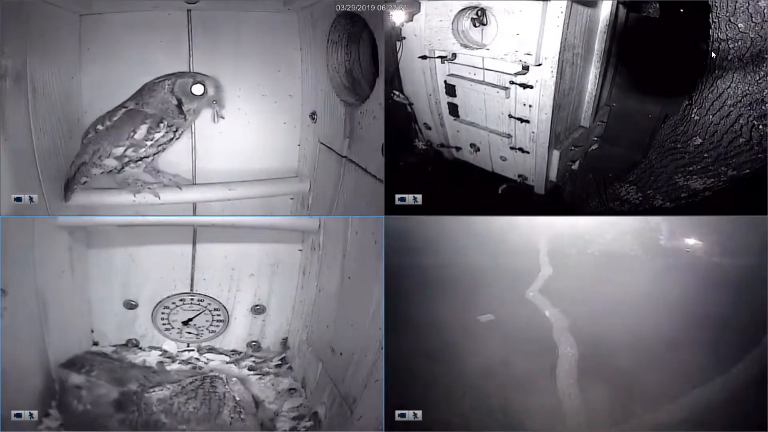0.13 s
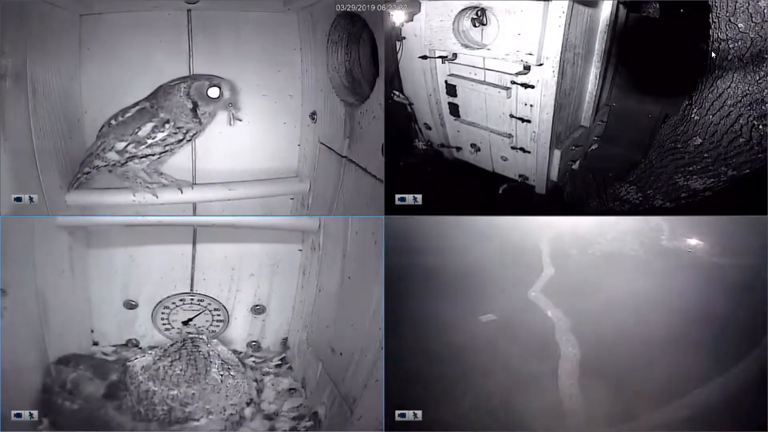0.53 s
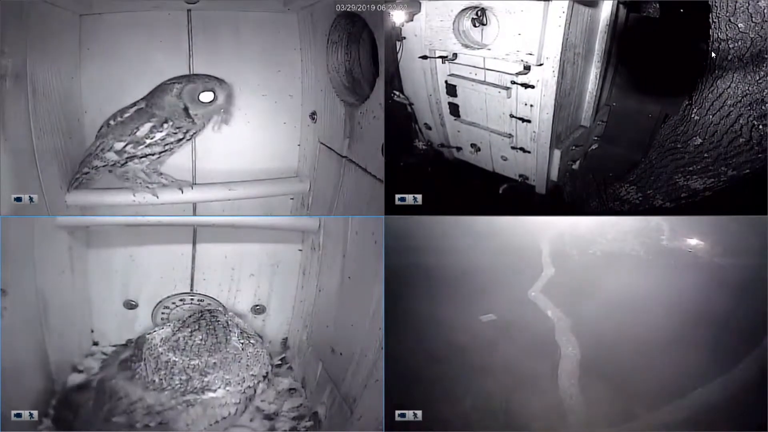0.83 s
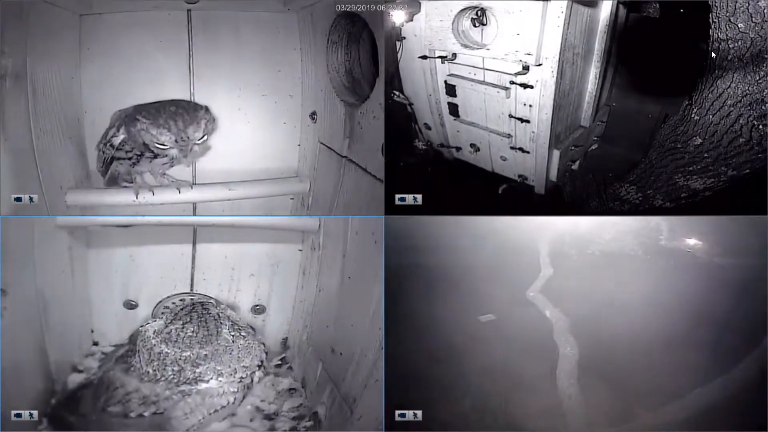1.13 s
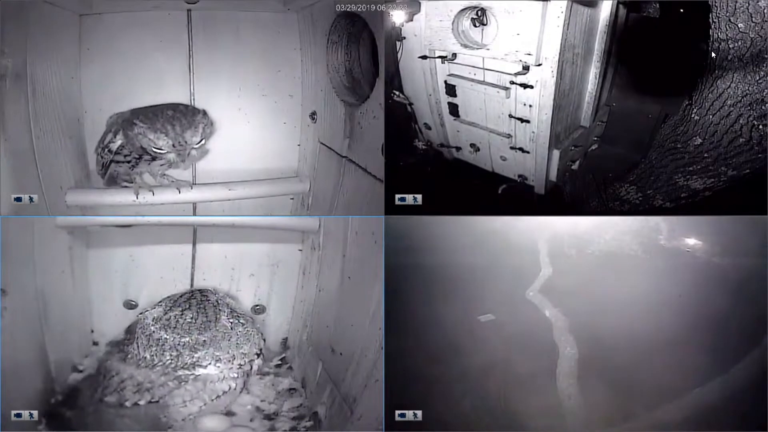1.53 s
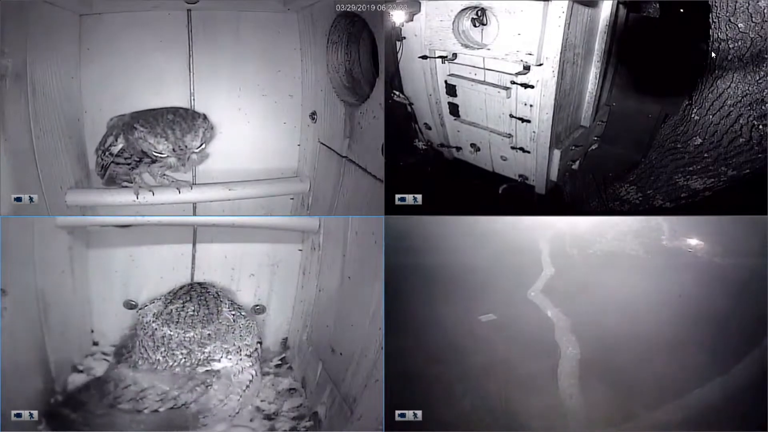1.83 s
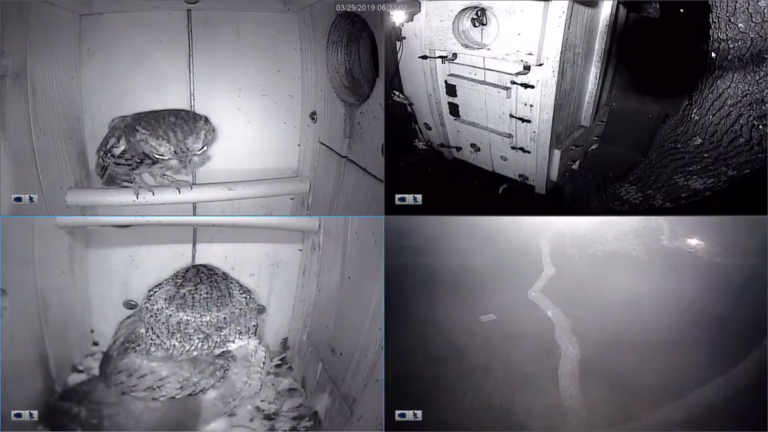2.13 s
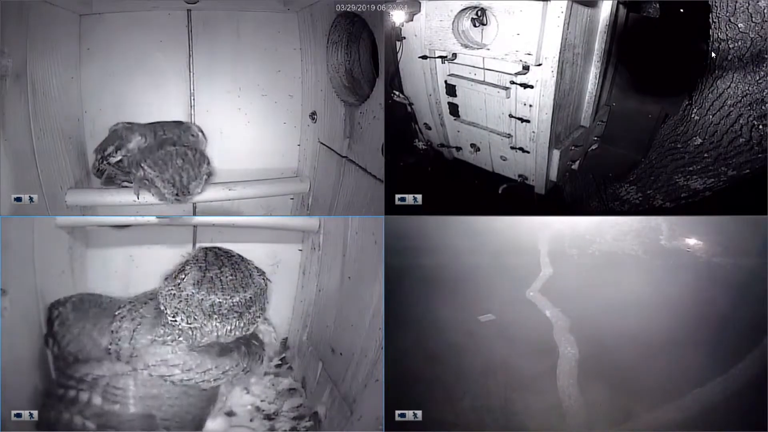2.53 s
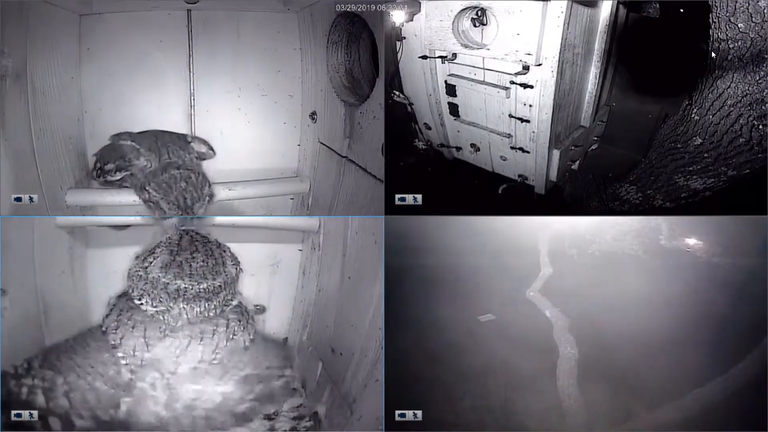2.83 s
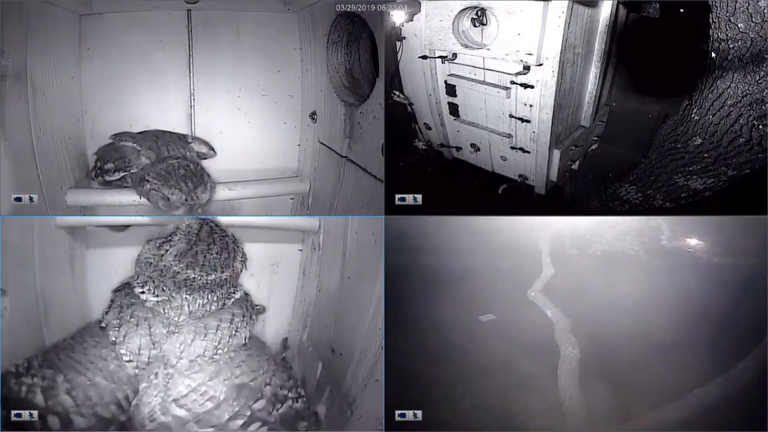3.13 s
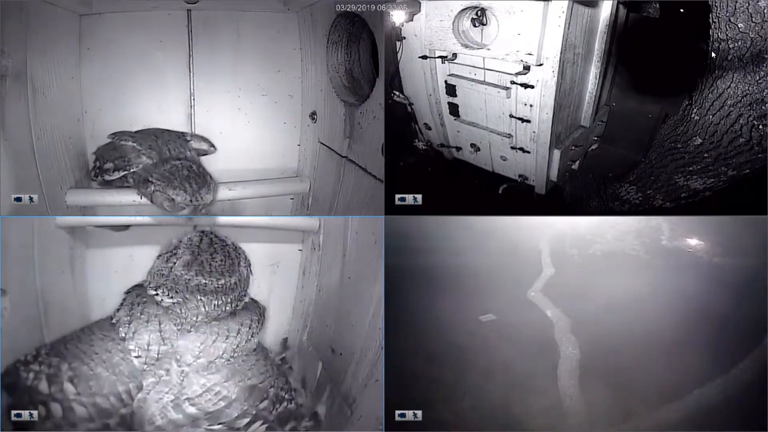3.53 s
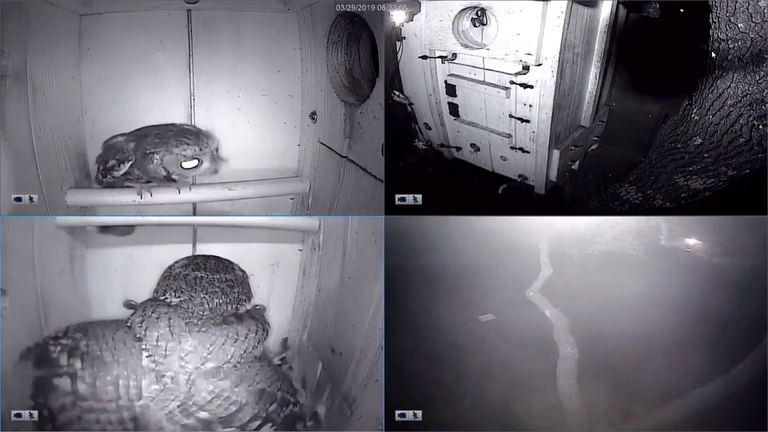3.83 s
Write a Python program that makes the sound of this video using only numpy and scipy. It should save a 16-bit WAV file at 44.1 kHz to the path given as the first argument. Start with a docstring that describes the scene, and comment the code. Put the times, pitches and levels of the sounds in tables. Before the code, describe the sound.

Owl trilling in rapid soft hoots, a short burst then a longer run, amid faint knocks

```python
"""In a wooden nest box a small owl trills: short pure notes that sag in pitch and set the air of the box ringing.
Its mate clucks softly and squeaks: near-sine notes with a rough level. Claws knock and tick on wood as
decaying modes, feathers rustle as dense grains, and outdoor noise leaks in through the hole over mains hum.
A camera microphone samples at 8 kHz with coarse companding."""
import sys
import numpy as np
from scipy import signal
from scipy.fft import rfft, irfft
from scipy.io import wavfile

SR = 44100
rng = np.random.default_rng(int(sys.argv[2]) if len(sys.argv) > 2 else 0)


def digitize_waveform(pressure):
    """Quantize a signal to 16-bit integers and store it at the path in sys.argv[1].

    Rows of a 2-D input are taken as channels; values are limited to [-1, 1].
    """
    field = np.atleast_2d(pressure).T
    bounded = np.clip(field, -1, 1)
    quanta = np.round(bounded * 32767).astype(np.int16)
    wavfile.write(sys.argv[1], SR, quanta)


def volts_from_decibels(level):
    """Turn decibel levels (scalar or array-like) into linear amplitude factors."""
    exponent = np.asarray(level, float) / 20
    return 10 ** exponent


N = 176400


def at_hz(points, hz):
    """Interpolate (hz, db) points over log frequency."""
    point_hz, point_db = np.transpose(points)
    return np.interp(np.log(hz + 1), np.log(point_hz), point_db)


def coloured(x, points):
    """Shape to a spectrum, rms 1."""
    gain = volts_from_decibels(at_hz(points, np.arange(N // 2 + 1) * SR / N))
    y = irfft(rfft(x) * gain, N)
    return y / y.std()


def drift(knots_per_s):
    """Random wander: unit-spread knots joined by straight lines."""
    knots = rng.standard_normal(int(N / SR * knots_per_s) + 2)
    return np.interp(np.arange(N) / SR * knots_per_s, np.arange(len(knots)), knots)


def add(out, start_s, x):
    """Mix x into out at start_s, cut at the end."""
    i = max(int(start_s * SR), 0)
    out[i:i + len(x)] += x[:N - i]


def rings(x, modes):
    """Two-pole resonators: a unit click makes each mode a decaying sine of its own height."""
    out = 0
    for hz, db, t60_s in modes:
        radius, omega = volts_from_decibels(-60 / (t60_s * SR)), 2 * np.pi * hz / SR
        poles = [1, -2 * radius * np.cos(omega), radius * radius]
        out = out + signal.lfilter([0, volts_from_decibels(db) * np.sin(omega)], poles, x + 1e-18)
    return out


def trill():
    """Notes swell and fade, start sharp and sag; overtones peak late; a puff at each onset rings the box air."""
    # trill notes: start_s, length_s, fundamental_peak_db, mean_pitch_hz
    notes = [(0.02, 0.057, -24, 621), (0.099, 0.056, -22, 620.3), (0.179, 0.056, -22, 617.4),
             (0.26, 0.053, -21.5, 612.7), (0.339, 0.052, -21.5, 616), (0.418, 0.044, -21.5, 614.6),
             (0.49, 0.042, -21, 622), (0.547, 0.046, -21.5, 623.6), (0.606, 0.046, -24, 627),
             (1.602, 0.033, -33, 610.4), (1.665, 0.043, -27, 627), (1.732, 0.041, -26.5, 627),
             (1.797, 0.043, -25.5, 630), (1.861, 0.044, -25, 625.5), (1.925, 0.045, -24.5, 626),
             (1.988, 0.042, -22.5, 633), (2.05, 0.047, -22.5, 627), (2.116, 0.049, -22, 630.7),
             (2.188, 0.058, -21, 625.4), (2.266, 0.059, -21, 627.3), (2.347, 0.064, -21, 624.3),
             (2.428, 0.064, -20.5, 623), (2.511, 0.055, -20, 621), (2.591, 0.051, -20, 622),
             (2.672, 0.045, -20, 623.3), (2.745, 0.044, -19.5, 621), (2.805, 0.047, -20, 623.6),
             (2.862, 0.042, -19, 625.7), (2.918, 0.043, -19.5, 624.3), (2.973, 0.048, -20.5, 625),
             (3.032, 0.043, -21, 628), (3.09, 0.04, -21.5, 633), (3.146, 0.044, -22.5, 637.6),
             (3.201, 0.044, -26.5, 621), (3.263, 0.04, -26, 612), (3.324, 0.038, -27.5, 618),
             (3.38, 0.038, -27.5, 614), (3.447, 0.038, -32.5, 619), (3.505, 0.037, -28, 597),
             (3.563, 0.034, -30, 597), (3.621, 0.037, -29.5, 597.5), (3.682, 0.037, -30, 606),
             (3.749, 0.032, -30, 596), (3.806, 0.036, -27, 595), (3.87, 0.032, -29.5, 596),
             (3.928, 0.038, -28, 589), (3.984, 0.065, -25, 597.3)]
    # throat state over time: time_s, onset_overshoot_hz, octave_db, puff_db, upper_partials_db
    throat = [(0, 77, -20, -6.5, -5), (0.401, 58, -23.5, -8.5, -6), (1.6, 40, -22.5, -12.5, 0.5),
              (2.2, 61.5, -15, -11, -8), (2.799, 34, -13, -12, -1.5), (3.1, 21, -20, -14.5, -7),
              (3.399, 6.9, -19, -2, -2), (4, 4.1, -23, -12.5, 2.5)]
    # upper partials before throat and brightness offsets: multiple, base_db
    upper_partials = [(3, -32), (4, -39), (5, -46), (6, -57), (7, -59)]
    # box air rung by the puffs: mode_hz, height_db, t60_s
    box_air = [(428, -2, 0.055), (940, -1, 0.04)]
    # box resonance near the note, rung by the voice: mode_hz, height_db, t60_s
    after_ring = [(602.5, -67, .16)]
    skew, roundness, octave_lag = 1.0, 1.05, 0.8
    # a sharper onset comes with an earlier peak and stronger high partials
    skew_per_hz, bright_db_per_hz = 0.0045, 0.1004
    settle_s, sag_per_s = 0.011, 4.0  # sag in overshoots a second
    partial_scatter_db = 3  # from note to note
    puff_s, puff_late_s = 0.004, 0.0005

    voice, puffs = np.zeros(N), np.zeros(N)
    times_s, *throat_columns = np.transpose(throat)
    start_turns = rng.random(len(notes))
    scatters = rng.standard_normal((len(notes), 5))
    for (start_s, length_s, db, hz), turn, scatter in zip(notes, start_turns, scatters):
        over_hz, octave_db, puff_db, upper_db = [np.interp(start_s, times_s, c) for c in throat_columns]
        t = np.arange(int(length_s * SR)) / SR
        progress = t / t[-1]
        shape = np.sin(np.pi * progress ** (skew - skew_per_hz * over_hz)).clip(0) ** roundness
        bend_hz = over_hz * (np.exp(-t / settle_s) - sag_per_s * t)
        # centre the bend so that the energy-weighted pitch is hz
        pitch_hz = hz + bend_hz - np.average(bend_hz, weights=shape ** 2)
        phase = 2 * np.pi * (np.cumsum(pitch_hz) / SR + turn)

        overtones = volts_from_decibels(octave_db) * np.sin(2 * phase)
        for (k, base_db), z in zip(upper_partials, scatter):
            bright_db = bright_db_per_hz * over_hz * (k - 4)
            partial_db = base_db + upper_db + bright_db + partial_scatter_db * z
            overtones += volts_from_decibels(partial_db) * np.sin(k * phase)
        late = (2 * progress) ** octave_lag * shape
        add(voice, start_s, volts_from_decibels(db) * shape * (np.sin(phase) + late * overtones))

        puff_n = int(puff_s * SR)
        puff = np.hanning(puff_n) * np.sin(phase[:puff_n] * 0.8)
        puff *= volts_from_decibels(db + puff_db + scatter[0]) / np.abs(puff).sum()
        add(puffs, start_s + puff_late_s, puff)
    return voice + rings(voice, after_ring) + rings(puffs, box_air)


def clucks():
    """Short near-sine notes of the second bird, low clucks and higher squeaks, with a rough level."""
    # low clucks: time_s (start is lead_s earlier), peak_db before roughness, mid_pitch_hz, length_s, rise_percent
    low_clucks = [(0.326, -38.5, 983, 0.018, -6.5), (0.893, -32.5, 797, 0.027, -5.5),
                  (1.287, -30.5, 841, 0.031, 17.5), (1.459, -42, 870, 0.03, 2),
                  (1.607, -34.5, 857, 0.037, -23.5), (1.882, -29.5, 852, 0.023, 8.5),
                  (1.952, -39.5, 801, 0.024, 6.5), (1.999, -35.5, 798, 0.023, 4),
                  (2.272, -29.5, 874, 0.02, 15.5), (2.334, -33.5, 826, 0.015, 7),
                  (2.387, -39.5, 770, 0.028, -3.5), (2.687, -32, 838, 0.022, -14),
                  (2.797, -36.5, 788, 0.022, -6), (2.845, -39, 816, .026, -2.5),
                  (3.018, -35.5, 899, 0.025, 10.5), (3.142, -35.5, 845, 0.021, -4.5),
                  (3.191, -34, 994, 0.015, -9), (3.619, -46, 888, 0.0096, 0.5),
                  (3.686, -37.5, 955, 0.014, 0), (3.768, -40.5, 834, 0.014, 8)]
    # squeaks: time_s (start is lead_s earlier), peak_db before roughness, mid_pitch_hz, length_s, rise_percent
    squeaks = [(3.25, -52, 1560, 0.01, 0.94), (3.292, -43, 1620, 0.02, 1.5),
               (3.715, -43, 1490, 0.0084, 1.7), (3.753, -48, 1586, 0.012, 1.9),
               (3.913, -52, 1584, 0.012, 1.8)]
    lead_s, rough_db, shortest_s = 0.0061, 2.5, 0.006
    out = np.zeros(N)
    for time_s, db, hz, length_s, rise_percent in low_clucks + squeaks:
        u = np.linspace(0, 1, int(max(length_s, shortest_s) * SR))
        pitch_hz = hz * (1 + rise_percent / 100 * (u - 0.5))
        shape = np.sin(np.pi * u ** 0.9) ** 0.79
        add(out, time_s - lead_s, volts_from_decibels(db) * shape * np.sin(2 * np.pi * np.cumsum(pitch_hz) / SR))
    return out * volts_from_decibels(rough_db * drift(250))


def claws():
    """Unit-sample impacts ring wood modes: soft knocks in dull and bright bands, brief high ticks."""
    # knocks: time_s, bright_click_db, dull_click_re_bright_db
    knocks = [(1.324, -32.5, 6), (1.42, -44, -13), (1.604, -29, 1), (3.032, -43.5, 4.5),
              (3.356, -28.5, -7.5), (3.361, -23, -0.5), (3.608, -39, 4.5)]
    # ticks: time_s, click_db
    tick_list = [(1.0239, -57.5), (1.2878, -51), (1.6022, -37.5), (3.3902, -41.5), (3.6291, -51.5),
                 (3.7129, -40), (3.751, -45.5)]
    # bright wood modes: mode_hz, height_db, t60_s
    bright_modes = [(865, 4, 0.045), (870, -7, 0.027)]
    # dull wood modes: mode_hz, height_db, t60_s
    dull_modes = [(230, -12, .05), (310, -12, .035), (545, -5, .055)]
    # tick modes: mode_hz, height_db, t60_s
    tick_modes = [(3350, -4, .022), (3800, -5, .008)]
    # knock band edges: dull_low_cut_hz, bright_low_cut_hz, top_hz
    contact_hz = (178, 520, 1240)
    dull_cut_hz, bright_cut_hz, top_hz = contact_hz
    tick_cut_hz = 2400

    bright, dull, ticks = np.zeros((3, N))
    for time_s, db, dull_db in knocks:
        i = int(time_s * SR)
        bright[i], dull[i] = volts_from_decibels(db), volts_from_decibels(db + dull_db)
    for time_s, db in tick_list:
        ticks[int(time_s * SR)] = volts_from_decibels(db)
    dull_band = signal.butter(4, (dull_cut_hz, top_hz), "band", fs=SR, output="sos")
    bright_band = signal.butter(4, (bright_cut_hz, top_hz), "band", fs=SR, output="sos")
    tick_band = signal.butter(2, tick_cut_hz, "high", fs=SR, output="sos")
    out = signal.sosfilt(bright_band, rings(bright, bright_modes))
    out += signal.sosfilt(dull_band, rings(dull, dull_modes))
    return out + signal.sosfilt(tick_band, rings(ticks, tick_modes))


def rustle():
    """Dense uneven grains of feather on wood, bright, in brushed swells."""
    # swells: middle_s, length_s, level_db (rms at the top, before flicker)
    swells = [(0.864, 0.23, -56), (1.317, 0.095, -52), (1.364, 0.06, -43.5), (1.488, 0.165, -48.5),
              (2.67, 0.27, -54.5), (2.941, 0.23, -54.5), (3.162, 0.53, -63), (3.323, 0.21, -55),
              (3.404, 0.073, -47.5), (3.465, 0.5, -63.5), (3.518, .14, -40), (3.641, 0.098, -51),
              (3.734, .11, -55), (3.918, 0.21, -57.5)]
    # grain spectrum, relative: frequency_hz, level_db
    rustle_colour = [(700, -14), (1000, -7), (1500, -15), (2300, -17), (2800, -11), (3350, -2.5),
                     (4000, -1.5)]
    grains_per_s, grain_spread_db, flicker_db = 3000, 2.5, 2.0
    hits = rng.random(N) < grains_per_s / SR
    heights = volts_from_decibels(grain_spread_db * np.minimum(rng.exponential(1, N), 4))
    grains = hits * heights * rng.choice([-1, 1], N)
    envelope = np.zeros(N)
    for middle_s, length_s, db in swells:
        add(envelope, middle_s - length_s / 2, volts_from_decibels(db) * np.hanning(int(length_s * SR)) ** 0.45)
    return envelope * volts_from_decibels(flicker_db * drift(70)) * coloured(grains, rustle_colour)


def background():
    """Noise coloured by the box, flickering a little, with mains hum and faint far whistles."""
    # noise spectrum, relative: frequency_hz, density_db (per Hz)
    ambience = [(30, -27), (50, -30), (100, -27), (160, -22), (250, -21), (420, -18.5), (600, -17.5),
                (730, -16.5), (860, -12), (1000, -10), (1100, -14.5), (1250, -23), (1600, -28),
                (2400, -35.5), (2680, -40.5), (2790, -31), (2900, -43), (3200, -43.5), (4000, -47)]
    # noise level before flicker: time_s, rms_db
    ambience_level = [(0, -48), (.8, -51), (1.1, -51.5), (1.5, -49), (2.0, -48), (2.6, -47.5), (3.2, -46.5),
                      (3.6, -46), (4, -49.5)]
    # mains hum: frequency_hz, level_db (6 dB under the sine peak)
    hum = [(120, -79), (240, -74)]
    # steady whistles: start_s, length_s, level_db, pitch_hz
    whistles = [(.95, .34, -47, 942), (3.86, .2, -47, 945)]
    flicker_db, whistle_attack_s = 2.0, 0.03
    t = np.arange(N) / SR
    noise_db = np.interp(t, *np.transpose(ambience_level)) + flicker_db * drift(40)
    out = coloured(rng.standard_normal(N), ambience) * volts_from_decibels(noise_db)
    for hz, db in hum:
        out += volts_from_decibels(db + 6) * np.sin(2 * np.pi * hz * t)
    for start_s, length_s, db, hz in whistles:
        u = t[:int(length_s * SR)]
        shape = np.minimum(u / whistle_attack_s, 1) * (1 - u / length_s) ** 0.3
        add(out, start_s, volts_from_decibels(db) * shape * np.sin(2 * np.pi * hz * u))
    return out


def scene():
    """Sum of the sources, one channel."""
    return (trill() + clucks() + claws() + rustle() + background())[None]


def roll_off(x):
    """The treble ends steeply here."""
    return signal.sosfilt(signal.butter(12, 15700, fs=SR, output="sos"), x)


def record(dry):
    """8 kHz sampling, coarse mu-law companding, playback filter that leaks mirror images; hiss, a digital click."""
    # playback filter: frequency_hz, gain_db
    playback = [(20, -1.5), (3500, 0), (4200, -4.5), (4700, -13), (5200, -23.5), (5600, -66.5),
                (7000, -90.5), (7400, -78), (8600, -70.5), (10000, -100)]
    camera_sr_hz, mu, steps, full_scale = 8000, 255, 220, 0.6  # steps on each side of zero
    hiss_db, glitch_s, glitch_db, glitch_decay_samples = -94, 1.4233, -34, 8.0

    count = N * camera_sr_hz // SR
    spectrum = rfft(dry[0] * signal.windows.tukey(N, 0.002))
    x = irfft(spectrum[:count // 2 + 1], count) * count / N / full_scale
    companded = np.sign(x) * np.log1p(mu * np.abs(x)) / np.log1p(mu)
    companded = np.round(steps * companded) / steps
    x = np.sign(companded) * np.expm1(np.abs(companded) * np.log1p(mu)) / mu * full_scale

    # the low-rate spectrum repeats upwards as mirror images
    bins = np.arange(N // 2 + 1)
    images = np.fft.fft(x)[bins % count]
    y = irfft(images * volts_from_decibels(at_hz(playback, bins * SR / N)), N) * N / count
    y += volts_from_decibels(hiss_db) * rng.standard_normal(N)
    add(y, glitch_s, -volts_from_decibels(glitch_db) * np.exp(-np.arange(60) / glitch_decay_samples))
    return roll_off(y[None])


dry = scene()
out = record(dry)
digitize_waveform(out)
```